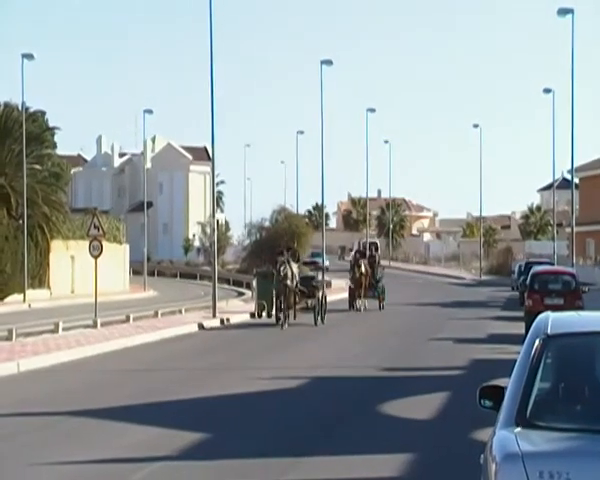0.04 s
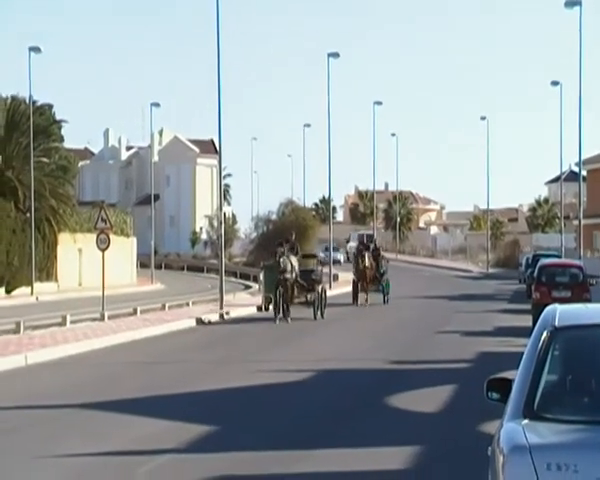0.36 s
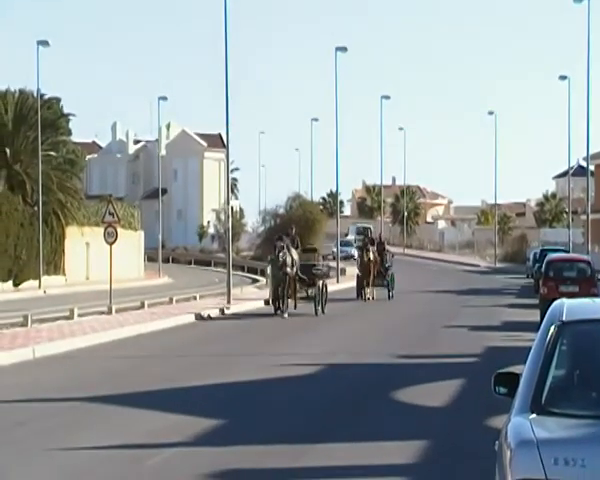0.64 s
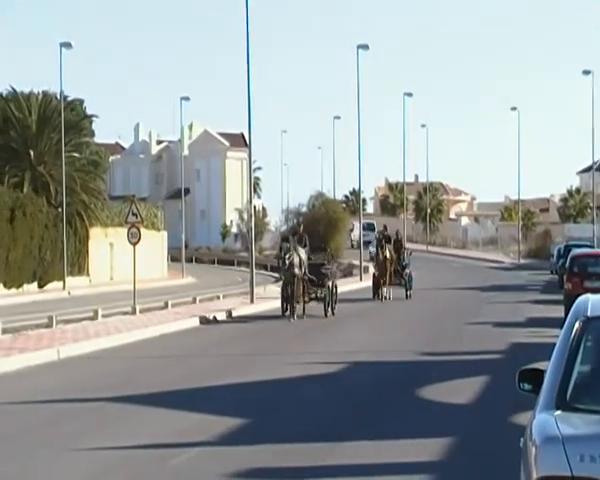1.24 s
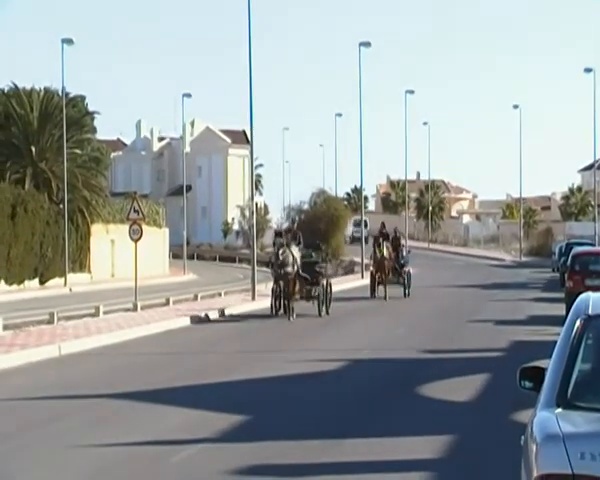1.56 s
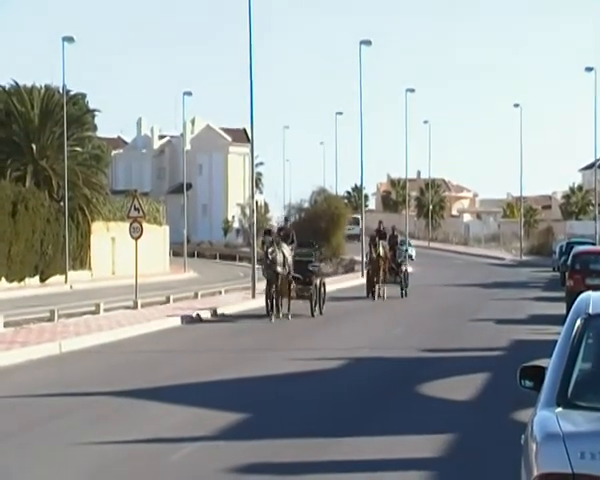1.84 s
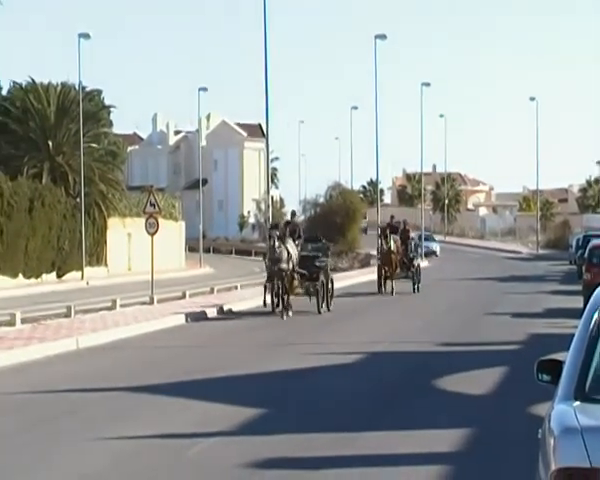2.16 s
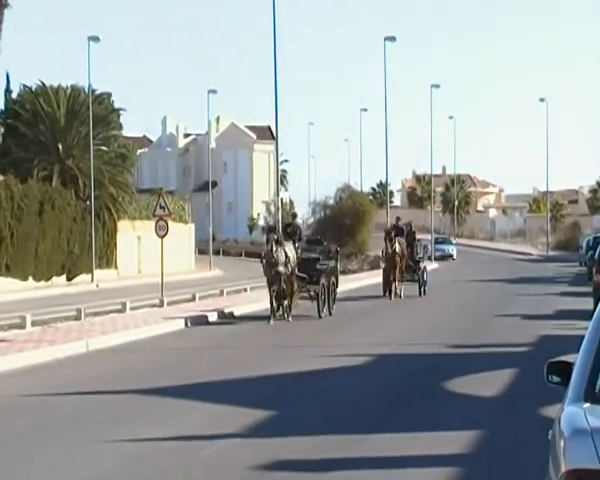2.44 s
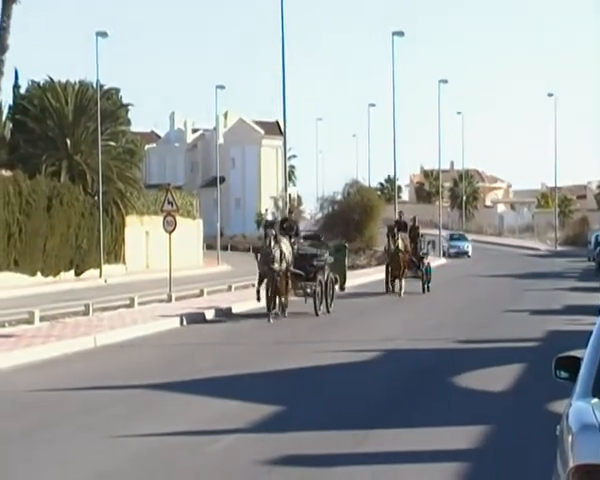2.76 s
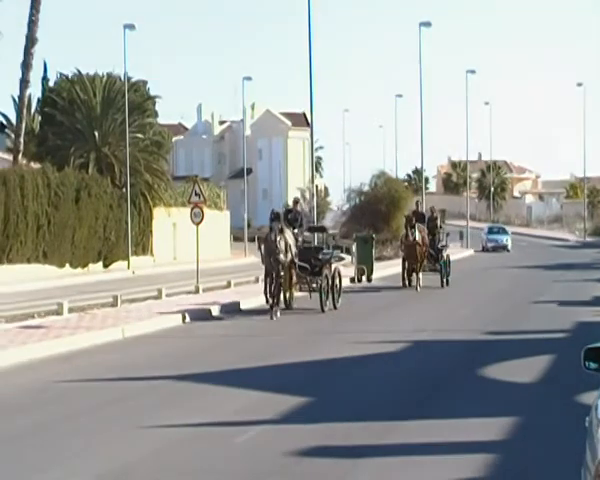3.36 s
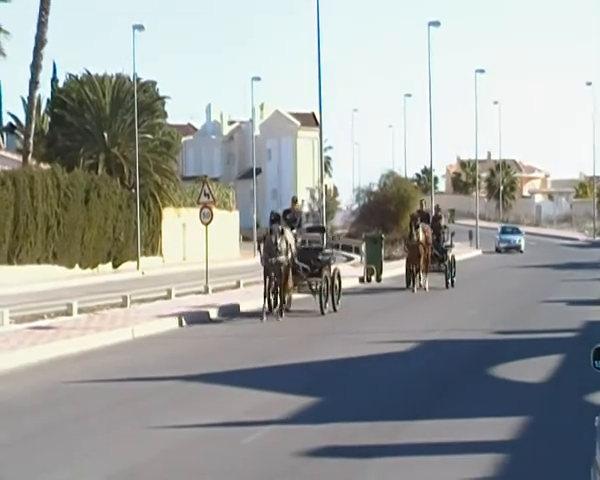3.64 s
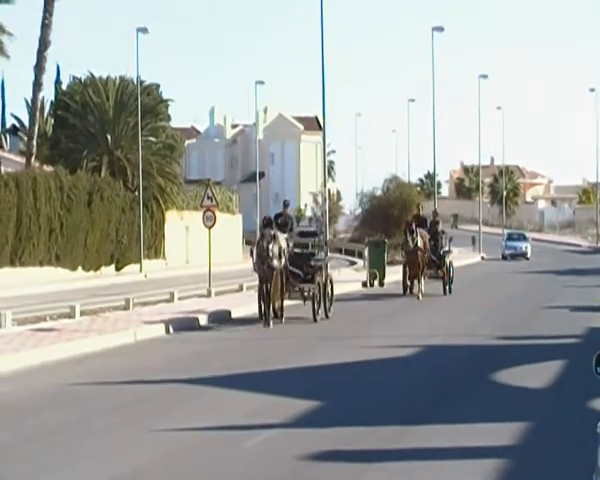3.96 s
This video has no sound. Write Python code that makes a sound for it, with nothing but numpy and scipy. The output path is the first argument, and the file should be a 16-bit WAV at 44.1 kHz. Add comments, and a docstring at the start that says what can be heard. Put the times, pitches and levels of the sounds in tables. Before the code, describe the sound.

Hooves of two trotting ponies clop on asphalt, echoing slightly off houses. Harness bells jingle at each stride and grow a little louder as the carriages approach, over a low motor hum and distant traffic hiss.

```python
"""Two ponies trotting closer

Two ponies pull light carriages along an asphalt street. Each iron shoe clicks and scuffs, the hollow
hoof clops, and the houses throw the sound back. Pellets rattle in the harness bells at every stride,
wheels crunch grit and a carriage squeaks. A small motor nearby hums and knocks over distant traffic."""
import sys
import numpy as np
from scipy import signal
from scipy.io import wavfile
from scipy.ndimage import uniform_filter1d

SR = 44100
rng = np.random.default_rng(int(sys.argv[2]) if len(sys.argv) > 2 else 0)


def log_audio(samples):
    """Write samples as a 16-bit WAV file to the path given in sys.argv[1]."""
    # one column per channel
    frames = np.atleast_2d(samples).T
    # limit to full scale, then quantise
    limited = np.clip(frames, -1, 1)
    pcm = np.round(limited * 32767).astype(np.int16)
    wavfile.write(sys.argv[1], SR, pcm)


N = 176400

# tone colour of iron on asphalt: f/Hz, gain/dB
IRON_ON_ASPHALT = [(100, -17), (500, 0.5), (1500, 7), (2600, 8.5), (4000, 6.5), (5500, -3.5), (8000, -11),
                   (10000, -22.5), (13000, -33)]


def hooves():
    """The iron shoe clicks and scuffs over grit, while the hollow of the hoof rings briefly: the clop."""
    # toe and heel landings: t/s, click strength/dB, clop strength/dB, clop f/Hz
    steps = [(0.104, -21.5, -30, 1144), (.119, -21, -20, 1176), (0.142, -28, -28, 1147),
             (.160, -29, -25, 1129), (0.183, -34, -38, 1120), (.212, -39, -32, 1093),
             (.405, -28, -26.5, 1133), (.425, -26, -23, 1200), (.434, -35, -29, 1166),
             (.448, -34, -32, 1116), (.521, -28.5, -27.5, 1035), (.563, -33, -42, 1070),
             (0.7326, -18, -33, 1144), (.750, -28, -21, 1140), (.819, -30, -30, 1045),
             (1.0505, -24.5, -42, 1140), (1.0609, -21.5, -23, 1148), (1.076, -35, -28.5, 1180),
             (1.1165, -29, -41, 1057), (1.3653, -23, -27.5, 1136), (1.377, -25, -29.5, 1140),
             (1.385, -26, -21.5, 1140), (1.438, -32, -28.5, 1003), (1.656, -41, -28.5, 1046),
             (1.696, -26, -27.5, 1140), (1.714, -30, -24.5, 1133), (1.749, -30, -25, 1044),
             (2.0194, -18.5, -36, 1100), (2.036, -22, -21, 1150), (2.047, -38, -25.5, 1175),
             (2.142, -35, -50, 1070), (2.353, -23.5, -27, 1104), (2.359, -18.5, -24.5, 1140),
             (2.372, -39, -28, 1123), (2.484, -29, -45, 1060), (2.657, -28, -29, 1097),
             (2.671, -17.5, -30, 1056), (2.698, -27, -24.5, 1027), (2.958, -33, -25, 1072),
             (3.017, -25, -24.5, 1113), (3.265, -32, -24.5, 995), (3.331, -27, -32, 1120),
             (3.362, -17.5, -18.5, 1137), (3.565, -34, -30, 1014), (3.687, -23.5, -30, 1137),
             (3.873, -30, -26, 1015), (3.89, -37, -28.5, 1000)]
    # tones of the hollow hoof: multiple of the clop pitch, level/dB, time to fade by 60 dB/s
    hoof_tones = [(.46, -12.5, 0.055), (.58, -4.5, 0.033), (.73, -7.5, 0.025), (0.899, -4, 0.037),
                  (1., 0, 0.043), (1.092, -2, 0.035), (1.45, -7, 0.015), (1.85, -5.5, 0.013)]
    click_lag_s, click_decay_s = 0.001004, 0.00093
    grains_per_s, scuff_decay_s, pitch_spread = 330, 0.028, 0.037
    t = np.arange(SR // 10) / SR
    clicks, clops = np.zeros(N), np.zeros(N)
    for start, click_db, clop_db, pitch_hz in steps:
        click = rng.standard_normal(len(t)) * np.exp(-t / click_decay_s)
        click *= amp(click_db + 13.5) / np.linalg.norm(click)
        scuff = grit(len(t), grains_per_s) * rise(t, 0.0027) * np.exp(-t / scuff_decay_s)
        # the scuff grows less with force than the click, so it stands out more in light steps
        scuff *= amp(0.75 * click_db + 5) / np.linalg.norm(scuff)
        add(clicks, start + click_lag_s, click + scuff)
        clop = 0
        for multiple, db, fade_s in hoof_tones:
            hz = pitch_hz * multiple * (1 + pitch_spread * rng.standard_normal())
            clop += amp(db) * fade(t, fade_s) * tone(t, hz)
        add(clops, start, amp(clop_db + 0.7) * clop * rise(t, 0.0015))
    return street(colour(clicks, IRON_ON_ASPHALT), echo_db=-4.5) + street(clops, echo_db=0)


def street(sound, echo_db):
    """Adds echoes to a sound; their paths change as the ponies move."""
    # bounces off road and carriage, then houses: delay/s, 60 dB fade/s, level/dB, left-right likeness
    spaces = [(.003, 0.122, 0, 0.96), (0.033, 0.54, -5.5, 0.85)]
    path_cycle_s, bounces_per_s = 2.3, 2000
    t = np.arange(SR // 2) / SR
    out = np.array([sound, sound])
    for offset in np.arange(4) / 4:  # four sets of echoes fade in and out in turn
        share = np.clip(np.cos(2 * np.pi * (np.arange(N) / SR / path_cycle_s + offset)), 0, 1)
        echo = 0
        for delay_s, fade_s, db, likeness in spaces:
            bounces = rng.choice([-1., 1.], (2, len(t))) * (rng.random((2, len(t))) < bounces_per_s / SR)
            bounces *= (t > delay_s) * fade(t, fade_s)
            bounces /= np.linalg.norm(bounces, axis=1, keepdims=True)
            echo += amp(db + echo_db) * pair(*bounces, likeness)
        out += signal.fftconvolve((sound * share)[None], echo, axes=1)[:, :N]
    return out


def harness_bells():
    """Loose pellets strike each bell and make it ring, harder at every jolt of the harness."""
    # one bell a row: f/Hz, level/dB for each of its three tones
    bells = [(2510, -7.5, 5648, 0, 9929, 6), (2570, -6, 6290, 0.5, 10030, 3),
             (2580, -9.5, 5936, 0.5, 10341, 6.5), (2634, -1.5, 6058, -1.5, 10560, -3),
             (2673, 2.5, 6121, 2.5, 10680, 11), (2680, 2.5, 6231, -1.5, 10800, 3.5),
             (2719, 1.5, 6350, -1, 10923, 4.5), (2743, 4, 6423, 0.5, 10440, -3.5),
             (2790, -2.5, 6560, -1.5, 11124, 4.5), (2826, 2, 6690, 1, 11262, -2),
             (2847, -8.5, 6490, -1, 11434, -16), (2957, -9, 6820, 1.5, 12000, -5),
             (2988, -4.5, 6988, -0.5, 14000, -4), (3043, -7.5, 7192, -1, 11600, -22)]
    # low, middle and high tone of all bells: level/dB, growth on approach/(dB/s), dB gained per dB of
    # jolt, left-right phase/rad, scatter of that phase/rad, left minus right/dB
    bell_tones = [(-48.5, 0.88, 0.8619, 0.28, 0.81, 3), (-61, 1.4, 0.7452, 3.02, 0.93, 0.5),
                  (-75, 2.1, 0.76, 0.84, 0.88, -2.5)]
    # jolts of the harness: t/s, length/s, strength above rest/dB
    jolts = [(-0.007, 0.19, 2.5), (0.222, 0.17, 7.5), (0.415, 0.13, 4), (0.572, 0.14, 5),
             (0.846, 0.19, 4.5), (1.062, 0.076, 5.5), (1.18, 0.16, 4), (1.517, 0.082, 7),
             (1.62, 0.071, 1.5), (1.798, .12, 7), (2.026, 0.035, 6.5), (2.116, .14, 7), (2.275, .05, 6.5),
             (2.38, 0.078, 7), (2.452, 0.14, 5.5), (2.71, .2, 8), (2.934, 0.088, 4.5), (3.014, 0.11, 7.5),
             (3.124, 0.1, 6), (3.244, .06, 4.5), (3.324, 0.098, 9), (3.437, 0.13, 7), (3.649, 0.089, 10),
             (3.743, 0.15, 3.5), (3.924, 0.1, 9)]
    hits_per_s, draws, force_spread_db = 110, 900, 3.6
    jolt_edge_s, half_band_hz, fades_s = 0.012, 210, (0.2, 0.2, 0.14)
    t = np.arange(N) / SR
    shake_db = sum(db * (np.tanh((t - start) / jolt_edge_s) - np.tanh((t - start - length) / jolt_edge_s))
                   for start, length, db in jolts) / 2
    out = np.zeros((2, N))
    for bell in bells:
        hit_s = (np.arange(draws) + 2 * rng.random(draws) - 1) / hits_per_s
        heard = (hit_s >= 0) & (hit_s < t[-1])
        at = (hit_s[heard] * SR).astype(int)
        size, turn, *strays = rng.standard_normal((5, draws))[:, heard]
        force = unit(amp(force_spread_db * size)) * np.exp(2j * np.pi * turn)  # strength and phase
        for hz, bell_db, fade_s, settings, stray in zip(bell[::2], bell[1::2], fades_s, bell_tones, strays):
            db, growth, response, phase, scatter, left_db = settings
            hits = np.zeros((2, N), complex)
            hits[:, at] = force * amp(response * shake_db[at] + growth * (t[at] - t[-1] / 2))
            hits[1, at] *= np.exp(-1j * (phase + scatter * stray))
            kept = fade(1 / SR, fade_s)  # share of the ringing left after one sample
            ring = signal.lfilter([1], [1, -kept * np.exp(2j * np.pi * hz / SR)], hits).real
            band = signal.butter(1, [hz - half_band_hz, hz + half_band_hz], "bandpass", fs=SR, output="sos")
            ring = signal.sosfilt(band, ring)  # softens each strike
            ring *= np.sqrt(2 * (1 - kept ** 2) * SR / hits_per_s)  # makes up for overlapping hits
            out += ring * amp(db + bell_db) * pan(left_db)
    return out


def single_bells():
    """Now and then one bell swings free and rings out on its own."""
    # free swings: t/s, f/Hz, level/dB
    swings = [(.25, 2820, -27.5), (.50, 5648, -53), (.56, 5648, -50), (.612, 4000, -50), (1.198, 2816, -27),
              (1.247, 2988, -27.5), (1.245, 7192, -49), (1.565, 3978, -53), (1.83, 2670, -34),
              (2.124, 2712, -26), (2.172, 2714, -23.5), (2.525, 2816, -23), (2.821, 3014, -36),
              (3.036, 2808, -22.5), (3.406, 2743, -25)]
    t = np.arange(SR // 2) / SR
    out = np.zeros(N)
    for start, hz, db in swings:
        add(out, start, amp(db) * rise(t, 0.0041) * fade(t, 0.31) * tone(t, hz))
    return out * pan(left_db=2)


def wheels():
    """The wheels crunch fine grit, louder as the carriages come nearer."""
    start_db, growth_db_per_s = -61.5, 3
    t = np.arange(N) / SR
    crunch = [unit(colour(side, IRON_ON_ASPHALT)) for side in grit((2, N), grains_per_s=2500)]
    return amp(start_db + growth_db_per_s * t) * pair(*crunch, likeness=0.3)


def squeak():
    """A carriage gives a thin, unsteady squeak that rises a little."""
    # tones of the squeak: t/s, length/s, f/Hz, level/dB
    squeak_tones = [(3.912, 0.091, 5400, -51), (3.954, 0.055, 3620, -49)]
    climb_per_s, wobble = 0.32, 0.0086  # as shares of the pitch
    out = np.zeros(N)
    for start, length, hz, db in squeak_tones:
        t = np.arange(0, length, 1 / SR)
        pitch_hz = hz * (1 + climb_per_s * t + wobble * wander(rate_hz=294)[:len(t)])
        swell = np.sqrt(abs(np.sin(np.pi * t / length)))
        add(out, start, amp(db) * swell * np.sin(2 * np.pi * np.cumsum(pitch_hz) / SR))
    return out


def motor():
    """A small motor gives a low, wavering hum, and its gears knock softly every few turns."""
    # tones of the hum: multiple of the turning speed, level/dB
    hum_tones = [(1, -56), (2, -43), (3, -56.5), (4, -56.5), (5, -52.5), (6, -53.5), (7, -62), (8, -71.5)]
    # tones of a gear knock: f/Hz, level/dB, time to fade by 60 dB/s
    knock_tones = [(219, -32, 0.093), (513, -36, 0.15)]
    turns_per_s, waver = 28.35, 0.13
    first_knock_s, turns_per_knock = 0.078, 5
    t = np.arange(N) / SR
    out = sum(amp(db) * (1 + waver * wander(rate_hz=10)) * tone(t, multiple * turns_per_s)
              for multiple, db in hum_tones)
    age = t[:SR // 4]
    for start in np.arange(first_knock_s, t[-1], turns_per_knock / turns_per_s):
        knock = sum(amp(db) * fade(age, fade_s) * tone(age, hz) for hz, db, fade_s in knock_tones)
        add(out, start, knock * rise(age, 0.0076))
    return out * pan(left_db=2)


def traffic():
    """Distant tyres blend into a hiss in which patches of low and high sound swell and sink."""
    # tone colour of the tyres: f/Hz, relative level/dB
    tyre_colour = [(20, -8), (70, -8), (110, -5), (200, -1.5), (300, -1), (400, -8), (520, -1), (800, -3.5),
                   (1100, 0), (1500, -5.5), (2300, -9.5), (3300, -11), (5000, -24), (8000, -25.5),
                   (9500, -46.5), (13000, -66)]
    # how alike the two sides are: f/Hz, likeness (1 = the same)
    likeness = [(50, 0.87), (250, 0.97), (1100, 0.91), (2000, 0.47), (4000, 0.18), (5500, 0.071),
                (12000, 0.096)]
    level_db, patch_db = -38.5, 2.5
    frame, hop = 1024, 256  # samples
    hz = np.fft.rfftfreq(frame, 1 / SR)
    a, b, c, d, patches = rng.standard_normal((5, N // hop + 5, len(hz)))
    patches = uniform_filter1d(patches, size=12, axis=0)  # smooth over time
    patches = unit(uniform_filter1d(patches, size=10, axis=1))  # and over frequency
    noise = pair(a + 1j * b, c + 1j * d, read(likeness, hz))
    spectrum = noise * amp(read(tyre_colour, hz) + patch_db * patches)
    hiss = signal.istft(spectrum.swapaxes(-1, -2), nperseg=frame, noverlap=frame - hop)[1][:, :N]
    return amp(level_db) * unit(hiss) * pan(left_db=0.8)


def amp(db):
    """Turns decibels into a gain."""
    return 10 ** (np.asarray(db) / 20)


def unit(x):
    """Scales a signal to an average power of 1."""
    return x / np.sqrt(np.mean(x ** 2) + 1e-20)


def tone(t, hz):
    """A pure tone that starts at a random point of its wave."""
    return np.sin(2 * np.pi * (hz * t + rng.random()))


def rise(t, seconds):
    """Climbs from 0 towards 1, about two thirds of the way in the given time."""
    return 1 - np.exp(-t / seconds)


def fade(t, seconds):
    """Dies away by 60 dB in the given time."""
    return np.exp(-np.log(1000) * t / seconds)


def grit(shape, grains_per_s):
    """Tiny ticks of random size at random moments."""
    return rng.standard_normal(shape) * (rng.random(shape) < grains_per_s / SR)


def wander(rate_hz):
    """A curve that drifts through 200 random values at the given rate."""
    return np.interp(np.arange(N) / SR * rate_hz, np.arange(200), rng.standard_normal(200))


def read(points, hz):
    """Reads between the rows of a table, on a log-frequency scale."""
    row_hz, value = np.transpose(points)
    return np.interp(np.log(hz + 1), np.log(row_hz + 1), value)


def colour(x, points, size=1024):
    """Gives a sound a tone colour, with a filter that never rings ahead of a hit."""
    log_gain = np.log(amp(read(points, abs(np.fft.fftfreq(size, 1 / SR)))))
    taps = np.fft.ifft(np.exp(np.conj(signal.hilbert(log_gain)))).real
    return signal.oaconvolve(x, taps)[:N]


def pan(left_db):
    """Left and right gains, with the left louder by left_db."""
    return amp(np.array([[left_db], [-left_db]]) / 2)


def pair(a, b, likeness):
    """Blends two unrelated signals into left and right; likeness 1 makes both sides the same."""
    return np.array([a, likeness * a + np.sqrt(1 - likeness ** 2) * b])


def add(mix, start_s, sound):
    """Mixes a sound in at a given time."""
    part = mix[max(round(start_s * SR), 0):][:len(sound)]
    part += sound[:len(part)]


def scene():
    """Hooves, bells and carriages in the street, over motor hum and traffic."""
    ponies = hooves() * pan(left_db=1) + harness_bells() + single_bells()
    return ponies + wheels() + squeak() + motor() + traffic()


def record(dry):
    """Cuts away the highest treble."""
    cutoff_hz = 12800
    lowpass = signal.firwin(511, cutoff_hz, window=("kaiser", 9), fs=SR)
    return signal.oaconvolve(dry, lowpass[None], "same")


dry = scene()
out = record(dry)
log_audio(out)
```